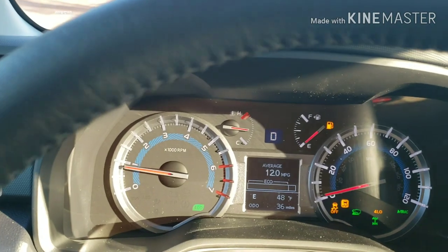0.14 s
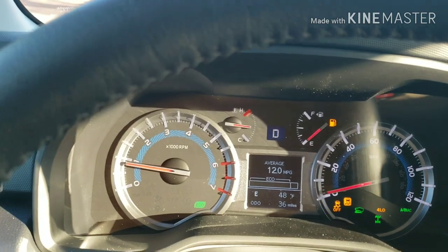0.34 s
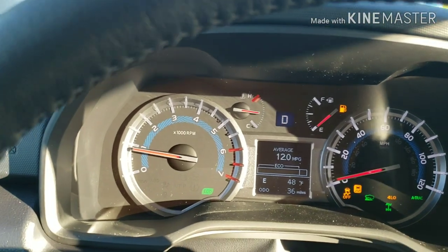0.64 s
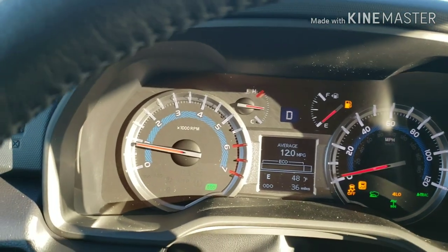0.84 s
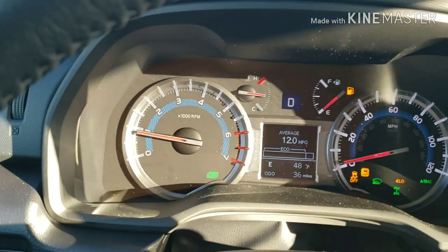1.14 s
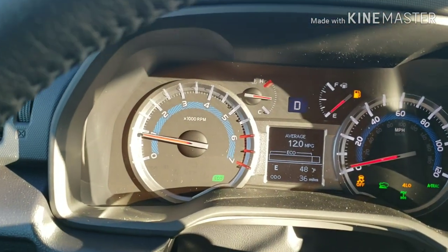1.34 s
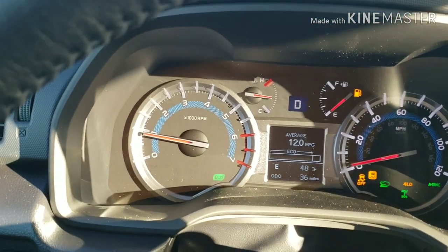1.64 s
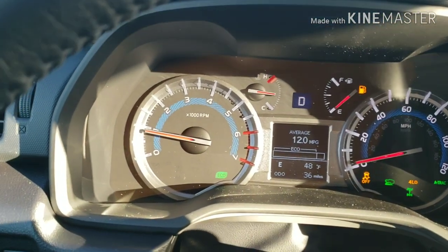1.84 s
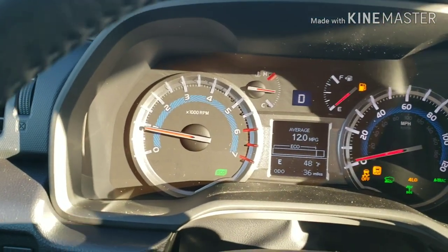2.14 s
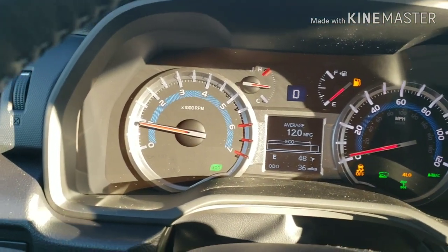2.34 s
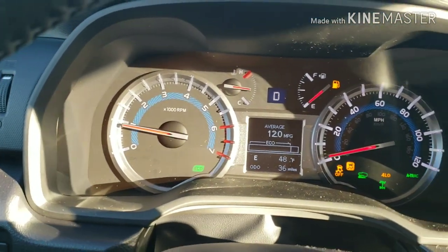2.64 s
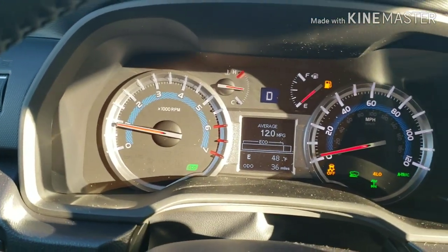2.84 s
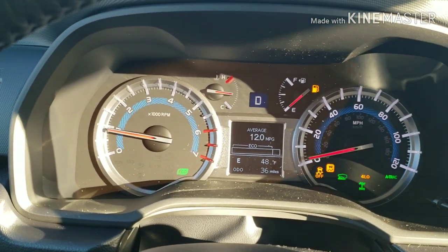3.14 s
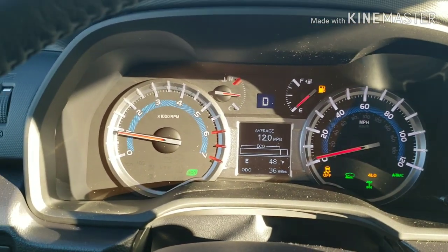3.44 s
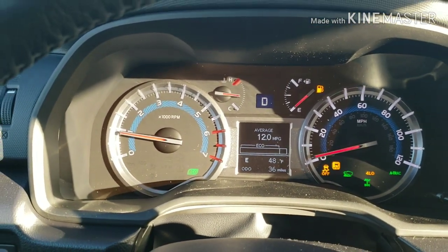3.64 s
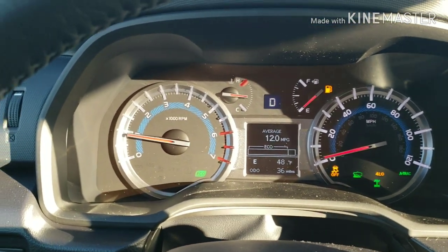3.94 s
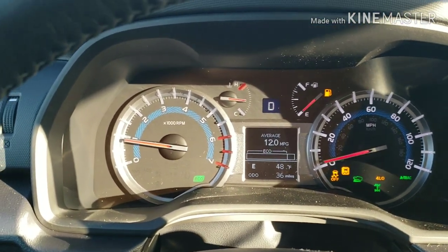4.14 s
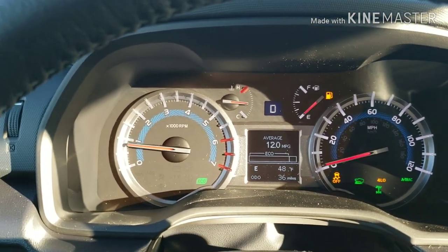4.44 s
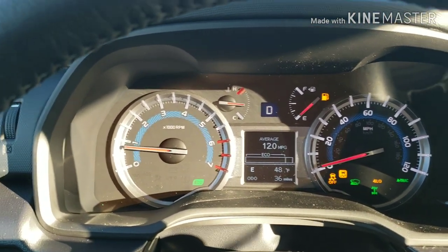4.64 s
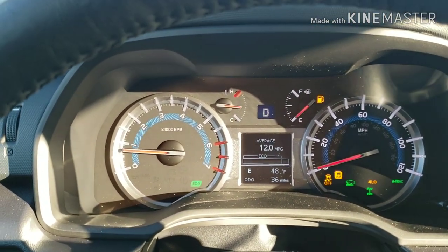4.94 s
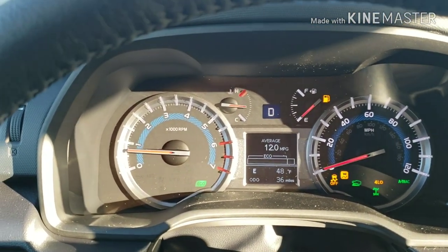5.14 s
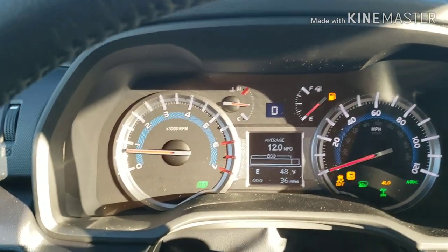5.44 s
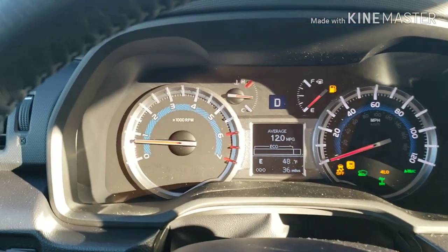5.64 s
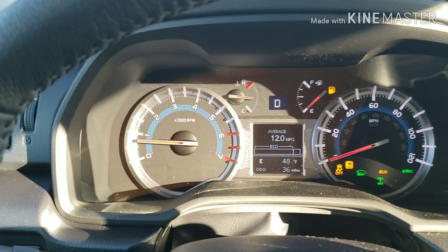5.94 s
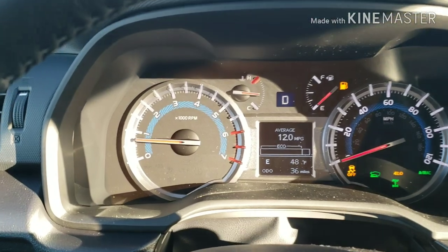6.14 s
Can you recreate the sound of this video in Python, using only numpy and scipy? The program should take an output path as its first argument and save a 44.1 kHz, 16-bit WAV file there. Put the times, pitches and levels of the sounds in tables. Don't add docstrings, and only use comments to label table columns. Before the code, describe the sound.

Inside a vehicle cabin, a low engine idle and soft road rumble run throughout. A brake unit clunks in irregular bursts: a quick cluster at the start, moderate knocks near two seconds, three heavy thumps after three seconds, then a pause and the hardest knocks near the end. Short fluid hisses follow the earlier knocks, and trim ticks lightly. A hand-held phone hears the bright cracks mostly from the left footwell.

```python
import sys
import numpy as np
from scipy import signal
from scipy.fft import rfft, irfft, next_fast_len
from scipy.io import wavfile
from scipy.ndimage import uniform_filter1d

SR = 44100
rng = np.random.default_rng(int(sys.argv[2]) if len(sys.argv) > 2 else 0)


def field_ratio(decibels):
    return 10 ** (np.asarray(decibels, dtype=float) / 20)


def waveform_to_disk(signal):
    frames = np.transpose(np.atleast_2d(signal))
    scaled = np.clip(frames, -1, 1) * 32767
    samples = np.round(scaled).astype(np.int16)
    wavfile.write(sys.argv[1], SR, samples)


N = 277389

# (frequency [Hz], level [dB per Hz])
RUMBLE_COLOUR = [(12, -44), (20, 2), (48, -2.5), (154, -12), (241, -20), (357, -14), (446, -26), (590, -22),
                 (849, -32.5), (1120, -35), (1330, -42.5), (1480, -45), (4810, -58), (14700, -56),
                 (16000, -55)]
# (frequency [Hz], likeness [0-1])
RUMBLE_LIKENESS = [(60, 1), (130, 1), (290, 0.75), (640, 0.5), (1410, 0), (3100, 0.03), (6820, 0),
                   (15000, 0)]
# (frequency [Hz], width [Hz], level [dB])
HUMMING_PANELS = [(358.5, 11.4, -2), (592, 26, 7.5), (820, 11, -7.5), (963, 9.7, -41.5), (1160, 15, -5),
                  (1660, 35, 2), (1665, 110, 8.5)]
# (time [s], firing rate [Hz], level [dB], rumble of the running gear [dB])
ENGINE_COURSE = [
    (0, 45, -52.5, 3.5),
    (.8, 45, -48.5, -2),
    (1.9, 46, -50, -1.5),
    (3.9, 46.2, -48, -1.5),
    (4.4, 39.43, -51.5, -2),
    (5, 36.54, -61, -2.5),
    (5.6, 35.81, -54, -1),
    (5.9, 36.17, -50.5, -9.5),
    (6.29, 35.93, -57, -2),
]
# (frequency [Hz], width [Hz], level [dB])
CABIN_MODES = [(37, 20, -7), (93.8, 18.5, 3), (161, 40, -4), (267.7, 27, 1.5), (356.6, 38, -7),
               (620, 130, -16)]
# (multiple of firing rate, level [dB])
EXHAUST_HUM = [(1, -4), (6, -3), (7, -13), (8, -7)]
BOOM_MULTIPLES = (7, 8, 9, 10, 12)
# (frequency [Hz], width [Hz], level [dB])
BOOM_MODES = [(360, 30, 0), (560, 30, -11)]
# (time [s], peak [dB], top above 5 kHz [dB], ring [Hz])
TRIM_TICKS = [(0.0002, -36.5, -3, 3070), (0.2192, -46, -8, 3350), (0.2826, -50.5, 1, 2970),
              (0.2998, -45.5, -13, 3300), (0.3145, -45, -6, 4800), (0.3396, -43.5, -11, 3300),
              (0.3941, -40.5, -12, 3280), (0.4094, -67, -6, 2950), (0.4392, -44.5, -6, 3030),
              (0.46, -57, -6, 4660), (0.5484, -38, -4.5, 4850), (0.595, -43, -9.5, 4770),
              (1.9994, -50, -3, 3480), (2.359, -62, 7, 3270), (3.5544, -57, -14, 2510),
              (5.4772, -46.5, -1.5, 2900), (5.5236, -52, -4, 3400), (6.267, -50, -4, 2690),
              (6.281, -52, 0, 4330)]
# (time [s], sway [Hz], sway level [dB], panels [dB], floor pan [dB])
BODY_JOLTS = [(0.084, 45, -33, -30.5, -27), (.13, 46, -40, -27, -29.5), (1.597, 62.7, -29, -22.5, -35),
              (1.697, 61.5, -36, -22, -32), (1.76, 46, -26.5, -33, -56), (1.897, 61, -25, -22.5, -32),
              (2.298, 65, -24, -23.5, -40), (2.41, 55, -29.5, -42, -57), (3.2, 59.4, -26, -22, -46),
              (3.296, 61, -25.5, -21, -54), (3.40, 60.5, -20.5, -26.5, -36), (3.52, 61, -27, -35, -41),
              (5.315, 40.2, -15.5, -21.5, -29.5), (5.354, 46, -34, -30, -25.5), (5.62, 46, -21, -21.5, -35),
              (5.72, 42, -19, -24.5, -41), (5.742, 47.8, -16.5, -23, -28.5)]
# (time [s], deep level [dB], upper level [dB])
WHEEL_BUMPS = [
    (.64, -34, -54),
    (3.9, -31.5, -53),
    (4.5, -33, -48),
    (5.86, -38.5, -47),
    (6.15, -28, -31),
]
# (frequency [Hz], or share of the sway rate, level [dB], ring time [s])
BODY_MODES = [(0.957, 1, 0.16), (99.6, -1, 0.13), (121.6, -4.5, 0.2), (139, -2, 0.17), (164.3, -7, 0.13),
              (192.94, -0.5, 0.76)]
# (frequency [Hz], width [Hz], level [dB])
DEEP_SHUDDER = [(31.2, 13, 3.5), (46, 5.6, 0), (61, 8.4, 5.5)]
# (frequency [Hz], width [Hz], level [dB])
UPPER_SHUDDER = [(84, 18.7, -2), (101, 15.4, 1.5), (124.9, 6.9, 1), (158.2, 17.1, 0.5), (174.8, 11.4, -4),
                 (197.7, 9.3, -0.5)]
# (frequency [Hz], level [dB], loudest time [s], swell length [s])
SQUEAL_PARTIALS = [
    (2790, -86.5, 6.1, 0.29),
    (4260, -84, 6.22, 0.23),
    (5640, -85.5, 6.04, 0.25),
]
# (time [s], level [dB])
SEEP = [
    (0, -84),
    (.5, -82),
    (2.2, -84),
    (3.1, -83),
    (3.6, -91),
    (4.0, -105),
]
# (time [s], length [s], level near 3 kHz [dB], top near 6.5 kHz against it [dB])
FLUID_GUSHES = [
    (0.13, 0.14, -69.5, -7.5),
    (0.27, 0.14, -63, -9),
    (1.624, 0.3, -61.5, -9),
    (1.765, 0.25, -60, -5.5),
    (2.3, .12, -87, 5),
    (2.48, 0.14, -58, -3.5),
    (3.162, 0.1, -64.5, 9.5),
    (3.237, 0.049, -72, 10.5),
    (3.34, .2, -84, -7),
]
# (frequency [Hz], width [Hz], level [dB])
FLUID_LOW_MODES = [(1810, 3200, -4.5), (2870, 1600, 2.5), (3300, 750, 3.5), (5170, 1600, -7)]
# (frequency [Hz], width [Hz], level [dB])
FLUID_TOP_MODES = [(5900, 660, 1.5), (7100, 1800, -4.5), (8300, 1500, -11), (9300, 3400, -9.5)]
# (time [s], peak [dB], top above 5 kHz [dB], ring time [s], ring [Hz])
VALVE_CRACKS = [(0.0676, -36, 2, 0.072, 3780), (0.114, -44.5, -18, 0.034, 3640),
                (0.1394, -47, -20, 0.038, 2120), (1.5783, -55, -4, 0.056, 3180),
                (1.596, -45, -8, 0.047, 3570), (1.6781, -47.5, -9, 0.086, 3250),
                (1.6931, -42.5, -5, 0.04, 3390), (1.89, -38.5, -7, 0.028, 3520),
                (2.289, -52.5, 0, 0.061, 3450), (3.1782, -57, -9, 0.13, 3160),
                (3.377, -33.5, -3.5, 0.067, 2900), (5.2709, -37.5, 3, 0.052, 2830),
                (5.3533, -33, -3, 0.043, 2280), (5.5852, -31, 4.5, 0.023, 2960),
                (5.6887, -47, 7.5, 0.054, 3800), (5.7044, -45, -12, 0.081, 2430),
                (5.7518, -27.5, -4.5, 0.028, 2380)]
# (frequency [Hz], level [dB per Hz])
CRACK_LOW_COLOUR = [(700, -38), (1100, -3.5), (1550, 0.5), (2300, -6.5), (3400, -5.5), (4400, -15),
                    (5200, -14.5), (7000, -35)]
# (frequency [Hz], level [dB per Hz])
CRACK_TOP_COLOUR = [(3200, -31), (4800, -20.5), (6100, -4.5), (7300, -7), (8300, -14), (10000, -9.5),
                    (14500, -16), (16000, -29)]
# (time [s], peak [dB], ring time [s], upper modes [dB])
VALVE_BLOWS = [(0.077, -22.5, 0.082, -9.5), (0.09, -23.5, 0.075, -14.5), (0.115, -26.5, 0.11, -15.5),
               (0.14, -37, 0.084, -13), (1.576, -32.5, 0.079, -7), (1.592, -37, 0.23, -6.5),
               (1.678, -30.5, 0.085, -10), (1.699, -34, 0.22, -8), (1.878, -30, 0.19, -7),
               (2.277, -31, 0.2, -8.5), (3.176, -17, 0.11, -19), (3.275, -19, 0.12, -16),
               (3.377, -15.5, 0.11, -13.5), (5.273, -26, 0.062, -5), (5.291, -19, 0.05, -17),
               (5.356, -14, 0.07, -13.5), (5.583, -27.5, 0.19, -5), (5.699, -17.5, 0.083, -10.5),
               (5.753, -17.5, 0.067, -10.5)]
# (frequency [Hz], level [dB])
BRACKET_MODES = [(300, -7.5), (345, -2), (375, -1), (420, -17), (530, 1.5), (580, 0.5), (660, 0), (800, -7),
                 (920, -6.5), (1120, -21), (1350, -19)]
# (frequency [Hz], level [dB per Hz])
THUD_COLOUR = [(90, -32.5), (170, 0.5), (330, 0.5), (620, -6), (1000, -24), (1800, -46.5)]
# (frequency [Hz], left minus right [dB])
LEFT_BALANCE = [(300, 6.5), (700, 4), (1300, 9), (2400, 15), (4400, 13.5), (8100, 9), (15000, -10)]
# (frequency [Hz], left minus right [dB])
AROUND_BALANCE = [(30, 1.2), (120, 2.6), (300, 2.6), (600, -.6), (1200, 4)]

JOLT_LEAD_S = 0.01212


def shaped(x, table):
    hz, db = np.transpose(table)
    size = next_fast_len(x.shape[-1])
    f = np.maximum(np.arange(size // 2 + 1) * SR / size, 1)
    gain = field_ratio(np.interp(np.log(f), np.log(hz), db))
    return irfft(rfft(x, size) * gain, size)[..., :x.shape[-1]]


def resonate(x, modes):
    out = 0
    for k, (hz, width, db) in enumerate(modes):
        b, a = signal.iirpeak(hz, hz / width, SR)
        out = out + (-1) ** k * field_ratio(db) * signal.lfilter(b, a, x)
    return out


def unit(x):
    return x / np.sqrt(np.mean(x ** 2))


def ringing_noise(modes, overall):
    return unit(resonate(resonate(rng.standard_normal(N), modes), [(*overall, 0)]))


def curves(table):
    s, *columns = np.transpose(table)
    return [np.interp(np.arange(N) / SR, s, c) for c in columns]


def walk(rate):
    k = int(SR / rate)
    held = np.repeat(rng.standard_normal(N // k + 1), k)
    return 1.397 * uniform_filter1d(uniform_filter1d(held, k), k)[:N]


def fade(t60, rise):
    t = np.arange(int(SR * t60)) / SR
    env = (1 - np.exp(-t / rise)) * np.exp(-np.log(1000) * t / t60)
    return t, env / env.max()


def add(out, s, x):
    i = max(int(s * SR), 0)
    out[i:i + len(x)] += x[:N - i]


def ports(x, lag_s, wet_db, balance):
    t60 = 0.1
    t = np.arange(int(SR * t60)) / SR
    tail = rng.standard_normal((2, len(t))) * np.exp(-np.log(1000) * t / t60) * (t > .002)
    tail = tail / np.sqrt(np.sum(tail ** 2) / 2)
    tail = signal.sosfilt(signal.butter(1, 500, "highpass", fs=SR, output="sos"), tail)
    answer = rfft(field_ratio(wet_db) * tail + (t == 0))
    power = np.abs(answer) ** 2
    even = np.sqrt(uniform_filter1d(power, size=300) / uniform_filter1d(power, size=30))
    above_bass = np.arange(power.shape[1]) > 70
    answer = irfft(answer * even ** above_bass, len(t))[:, :len(t) * 4 // 5]
    wet = signal.fftconvolve(x[None], answer, axes=1)[:, :N]
    left = shaped(wet[0], [(hz, db / 2) for hz, db in balance])
    right = shaped(wet[1], [(hz, -db / 2) for hz, db in balance])
    return np.array([left, np.roll(right, int(lag_s * SR))])


def rumble_and_hiss(rumble_db):
    out = 0
    likeness_hz, likeness = np.transpose(RUMBLE_LIKENESS)
    for hz in 22 * 2 ** np.arange(0, 9.6, .5):
        alike = np.clip(np.interp(np.log(hz), np.log(likeness_hz), likeness), 0, 1)
        band = [hz * 2 ** -.25, hz * 2 ** .25]
        sos = signal.butter(2, band, "bandpass", fs=SR, output="sos")
        mid, side = signal.sosfilt(sos, rng.standard_normal((2, N)))
        pair = np.sqrt(1 + alike) * mid + np.sqrt(1 - alike) * side * np.array([[1], [-1]])
        flicker_db = min(2.2, 2500 / hz) * walk(6.6)
        out = out + pair * field_ratio(flicker_db + rumble_db * (hz < 2500))
    out = shaped(out, RUMBLE_COLOUR)
    return field_ratio(-44) * unit(out + resonate(out, HUMMING_PANELS))


def engine(hz, db):
    turns = np.cumsum(hz * (1 + .004 * walk(5))) / SR
    at = np.flatnonzero(np.diff(np.floor(turns)))
    cylinders_db = np.resize([-1.3, 5.1, 3.0, 1.0, -3.0, -1.0], len(at))
    pulses = np.zeros(N)
    pulses[at] = field_ratio(1.8 * rng.standard_normal(len(at)) + cylinders_db)
    soft = signal.sosfilt(signal.butter(4, 600, fs=SR, output="sos"), pulses)
    hum = sum(field_ratio(level + 2.5 * walk(8)) * np.sin(2 * np.pi * k * turns) for k, level in EXHAUST_HUM)
    boom = sum(field_ratio(4 * walk(9)) * np.sin(2 * np.pi * k * turns) for k in BOOM_MULTIPLES)
    firing = unit(resonate(soft, CABIN_MODES))
    return field_ratio(db) * (firing + field_ratio(-7.0) * hum) + field_ratio(-57) * unit(resonate(boom, BOOM_MODES))


def trim_ticks():
    t60 = 0.038
    table = [(s, db, top_db, t60, ring_hz) for s, db, top_db, ring_hz in TRIM_TICKS]
    return shaped(cracks(table, 0.00017, -15, ring_db=-7), [(1500, -8), (2800, 1.5)])


def shudder(road_db, jolts, fall_db, rise, t60):
    power = np.full(N, field_ratio(2 * road_db))
    env = fade(t60, rise)[1]
    for s, db in jolts:
        add(power, s - JOLT_LEAD_S, (field_ratio(db + fall_db) * env) ** 2)
    return np.sqrt(power)


def body():
    deep = [(s, sway_db) for s, _, sway_db, _, _ in BODY_JOLTS] + [(s, db) for s, db, _ in WHEEL_BUMPS]
    upper = [(s, panel_db) for s, _, _, panel_db, _ in BODY_JOLTS] + [(s, db) for s, _, db in WHEEL_BUMPS]
    out = shudder(-48, deep, -7.5, 0.01, 1.43) * ringing_noise(DEEP_SHUDDER, (45, 108))
    out += shudder(-47, upper, -8, 0.0074, 0.6) * ringing_noise(UPPER_SHUDDER, (125, 133))
    chances = rng.standard_normal((len(BODY_JOLTS), len(BODY_MODES), 2))
    for (s, sway_hz, sway_db, panel_db, pan_db), chance in zip(BODY_JOLTS, chances):
        levels = [sway_db] + [panel_db] * (len(BODY_MODES) - 2) + [pan_db]
        for k, (hz, db, t60) in enumerate(BODY_MODES):
            t, env = fade(t60, 0.0091)
            pitch = hz * sway_hz if k == 0 else hz * (1 + 0.0203 * chance[k, 1])
            gain = field_ratio(db - 3.5 + levels[k] + 2.43 * chance[k, 0])
            add(out, s - JOLT_LEAD_S * (k > 0), gain * env * np.sin(2 * np.pi * pitch * t))
    return out


def squeal():
    start_s, rise_s = 5.8, .06
    t, out = np.arange(N) / SR, 0
    for hz, db, s, swell in SQUEAL_PARTIALS:
        rough = ringing_noise([(hz, 170, 0)], (hz, 900))
        out = out + field_ratio(db - 4.2 * ((t - s) / swell) ** 2 + 2 * walk(12)) * rough
    return out * np.clip((t - start_s) / rise_s, 0, 1)


def leak():
    hiss = ringing_noise([(6620, 420, -1.8), (6920, 660, 1.8)], (6320, 1100))
    return field_ratio(curves(SEEP)[0] - 3.5) * hiss


def fluid():
    open_s, sag_db_per_s, close_db_per_s = 0.044, 25, 260
    t = np.arange(N) / SR
    trickle = field_ratio(curves(SEEP)[0] + 5.5)
    flow = np.array([trickle, trickle])
    for s, length, db, top_db in FLUID_GUSHES:
        sag_db = sag_db_per_s * np.clip(t - s, 0, length)
        close_db = close_db_per_s * np.maximum(t - s - length, 0)
        opening = np.clip((t - s) / open_s, 0, 1) ** 2
        flow = flow + opening * field_ratio(db - sag_db - close_db + np.array([[0], [top_db]]))
    low = ringing_noise(FLUID_LOW_MODES, (3600, 11000))
    top = ringing_noise(FLUID_TOP_MODES, (7000, 4000))
    return flow[0] * field_ratio(-10.5 + 1.1 * walk(60)) * low + flow[1] * field_ratio(-11.0 + 0.94 * walk(67)) * top


def cracks(table, rise, tail_db, ring_db):
    out, white = np.zeros(N), rng.standard_normal((3, N))
    low = unit(shaped(white[0], CRACK_LOW_COLOUR))
    top = unit(shaped(white[1], CRACK_TOP_COLOUR))
    rattle = field_ratio(4.08 * walk(300))
    for s, peak_db, top_db, t60, ring_hz in table:
        t, tail = fade(2.6 * t60, rise)
        env = tail ** 11.2 + field_ratio(tail_db) * tail
        part = np.arange(int(s * SR), int(s * SR) + len(t)) % N
        mode = [(ring_hz, 450, 0)]
        ring = unit(resonate(resonate(white[2, part], mode), mode))
        noise = rattle[part] * (low[part] + field_ratio(top_db) * top[part])
        add(out, s - .001, field_ratio(peak_db - 12.5) * env * (noise + field_ratio(ring_db) * ring))
    return out


def blows():
    hz, db = np.transpose(BRACKET_MODES)[:, :, None]
    upper = (np.arange(len(BRACKET_MODES)) >= 4)[:, None]
    out, thud = np.zeros(N), np.zeros(N)
    dull = unit(shaped(rng.standard_normal(N), THUD_COLOUR))
    chances = rng.standard_normal((len(VALVE_BLOWS), 3, len(BRACKET_MODES), 1))
    for (s, peak_db, t60, upper_db), chance in zip(VALVE_BLOWS, chances):
        t, env = fade(t60, 0.0095)
        gain = field_ratio(db + np.where(upper, upper_db - 2.5 + 1.8 * chance[0], 1.24 * chance[0]))
        pitch = hz * (1 + np.where(upper, .03, .012) * chance[1])
        turns = pitch * t + np.where(upper, .3, .05) * chance[2]
        ring = np.sum(gain * np.sin(2 * np.pi * turns), axis=0)
        add(out, s - .003, field_ratio(peak_db - 6.5) * env * ring)
        add(thud, s - .004, field_ratio(peak_db + upper_db - 3) * fade(2.58 * t60, .005)[1])
    return out + thud * dull


def scene():
    lag_s = .0003
    hz, engine_db, rumble_db = curves(ENGINE_COURSE)
    background = rumble_and_hiss(rumble_db)
    around = ports(engine(hz, engine_db) + body() + blows(), 0, wet_db=2.0, balance=AROUND_BALANCE)
    trim = ports(trim_ticks(), lag_s, wet_db=-4, balance=LEFT_BALANCE)
    brakes = squeal() + leak() + fluid() + cracks(VALVE_CRACKS, 0.0013, -11.5, ring_db=-2)
    footwell = ports(brakes, lag_s, wet_db=4, balance=LEFT_BALANCE)
    return background + around + trim + footwell


def roll_off(x):
    return signal.sosfilt(signal.butter(12, 16250, fs=SR, output="sos"), x)


def record(dry):
    return roll_off(dry)


dry = scene()
out = record(dry)
waveform_to_disk(out)
```